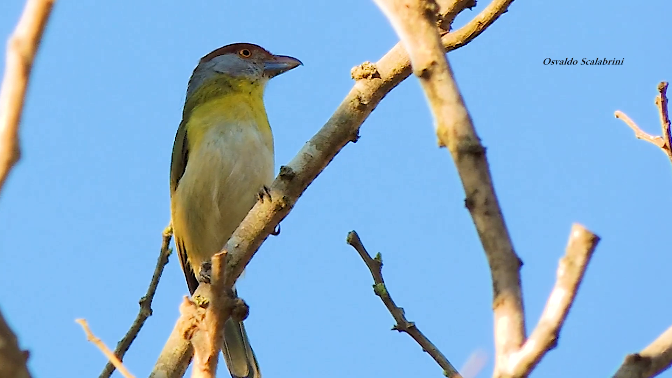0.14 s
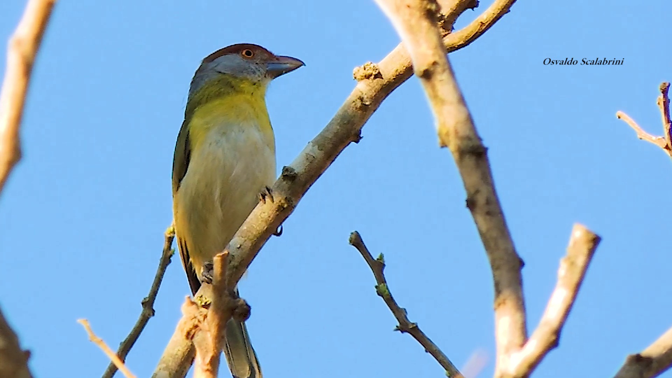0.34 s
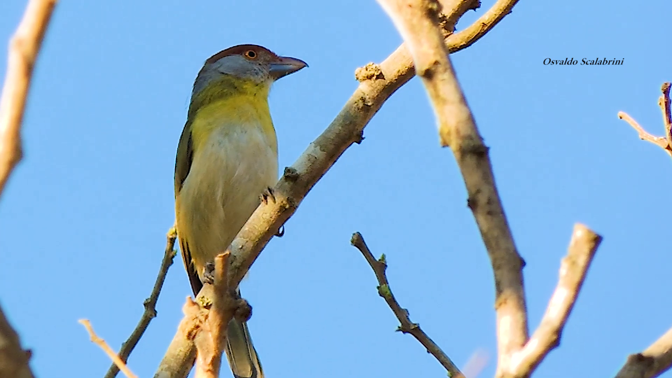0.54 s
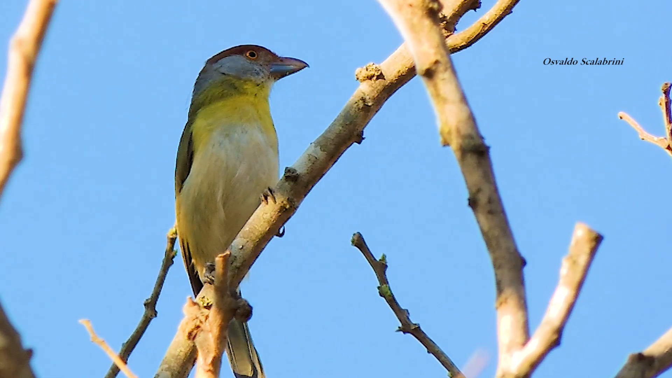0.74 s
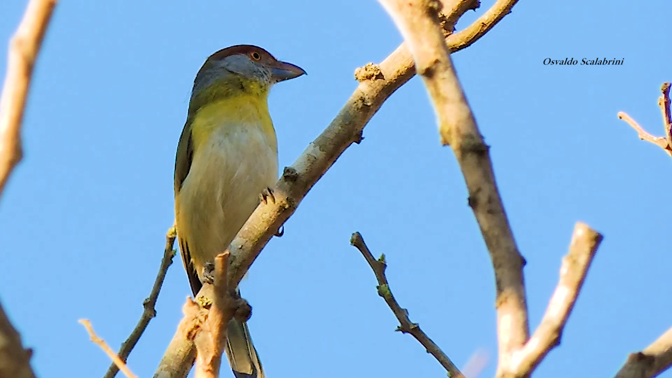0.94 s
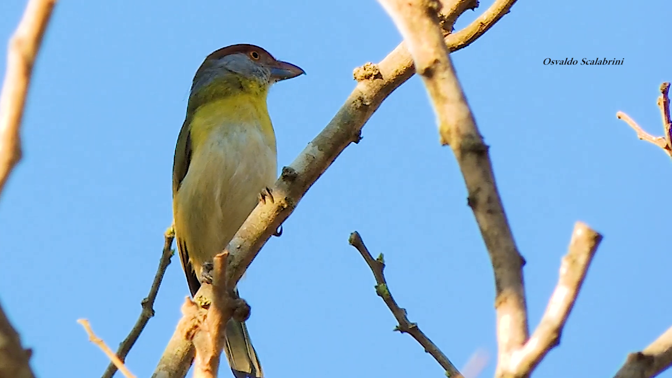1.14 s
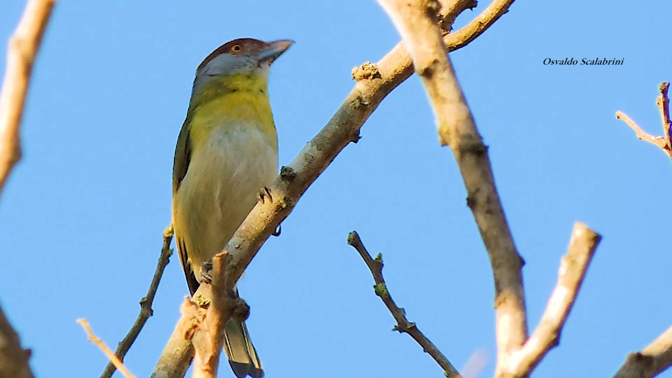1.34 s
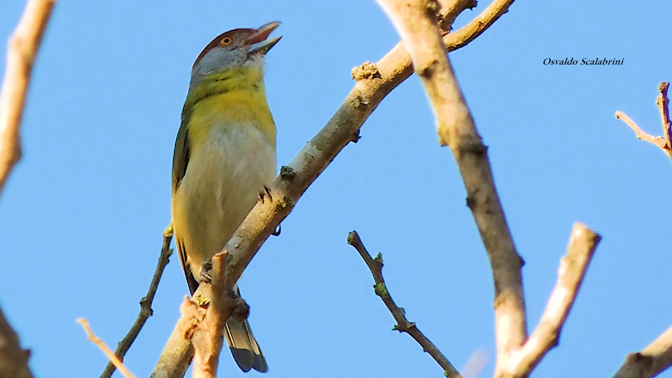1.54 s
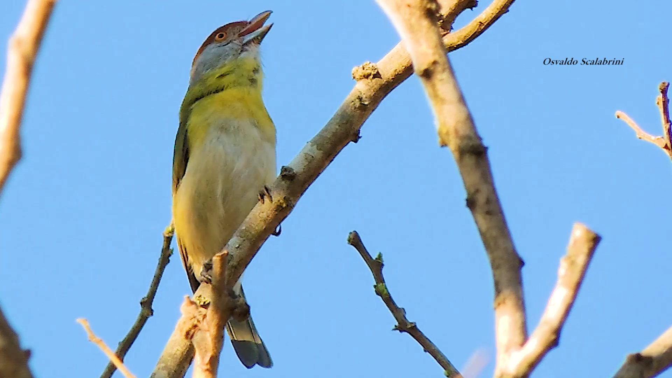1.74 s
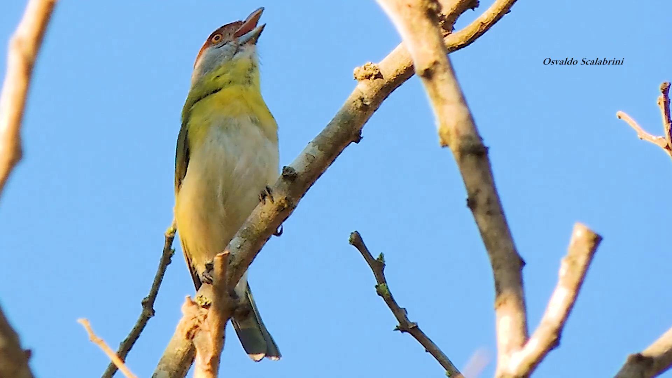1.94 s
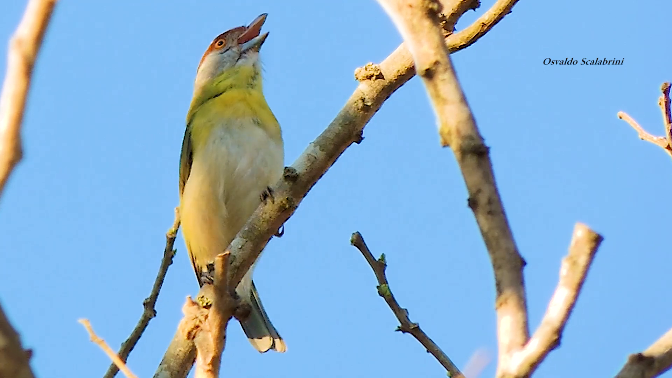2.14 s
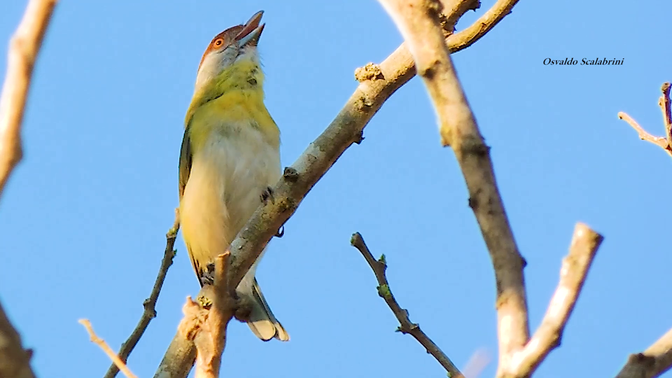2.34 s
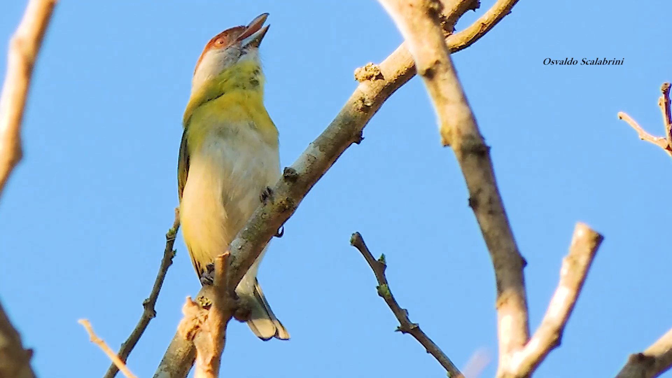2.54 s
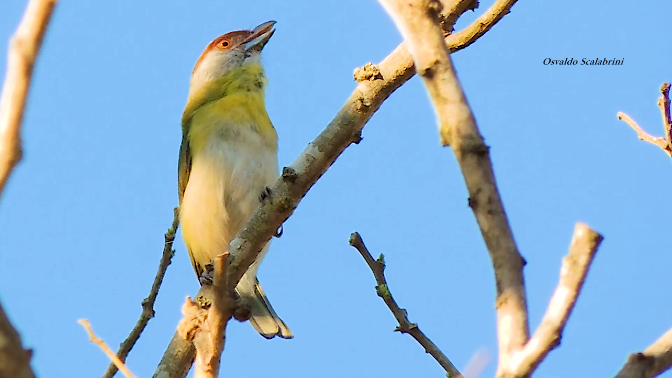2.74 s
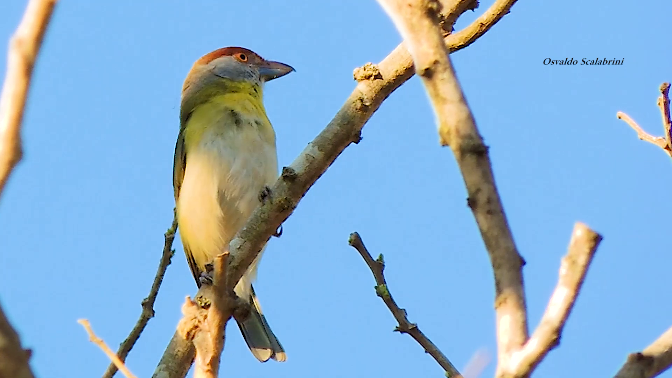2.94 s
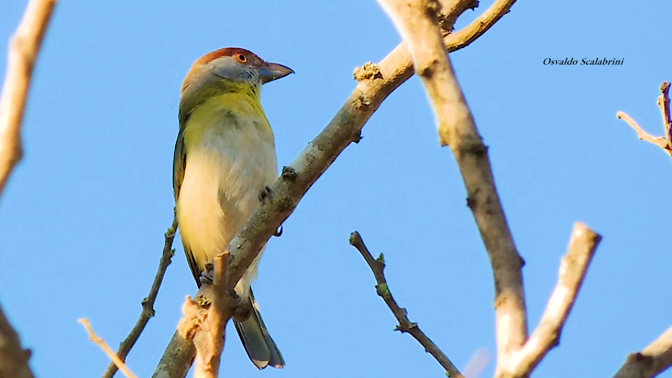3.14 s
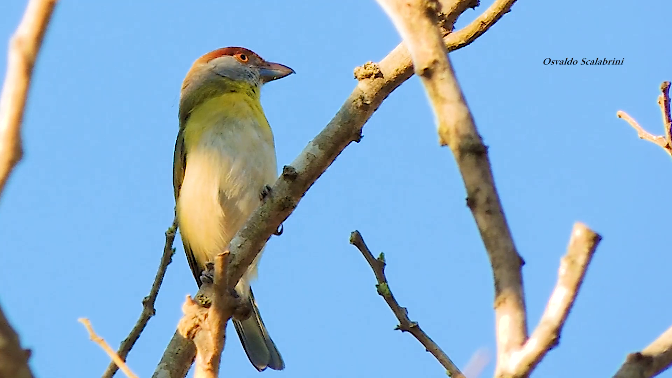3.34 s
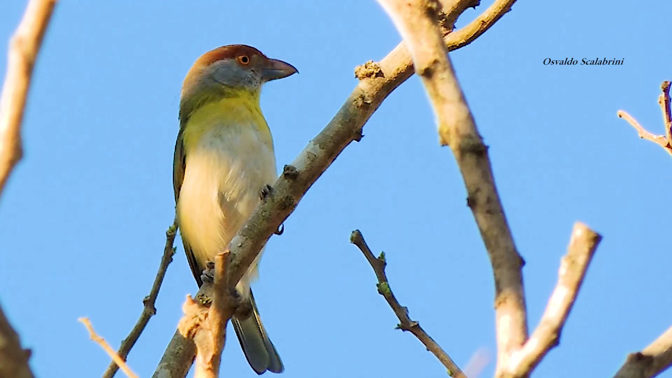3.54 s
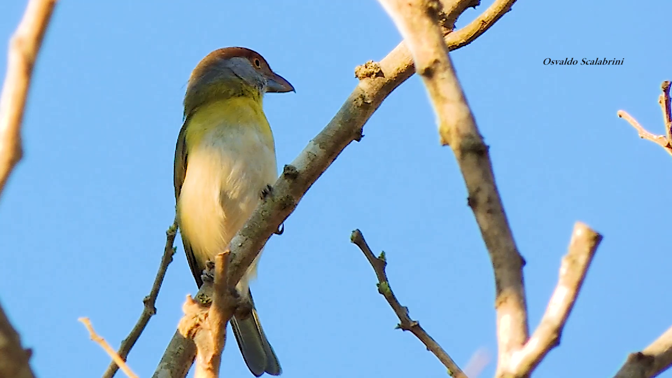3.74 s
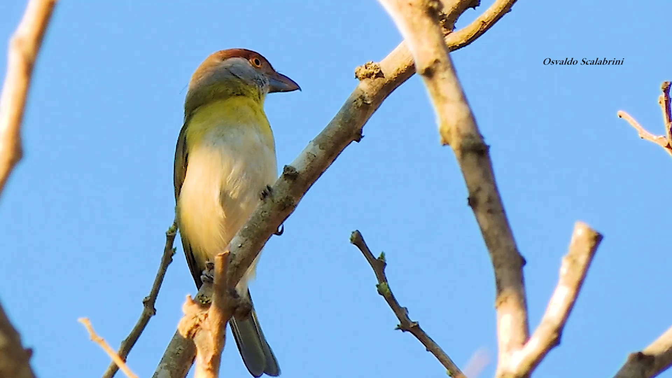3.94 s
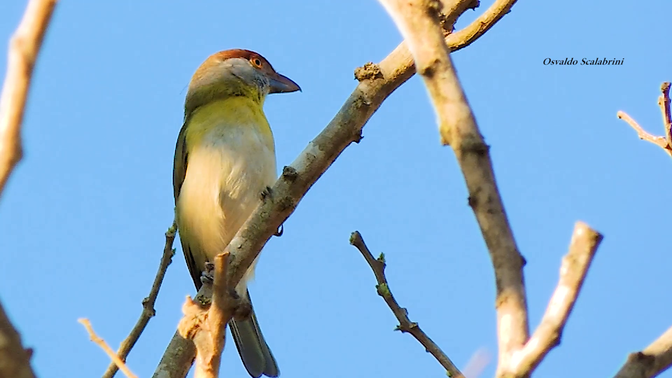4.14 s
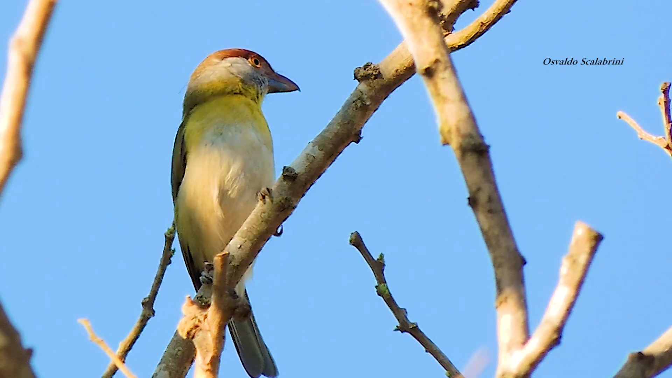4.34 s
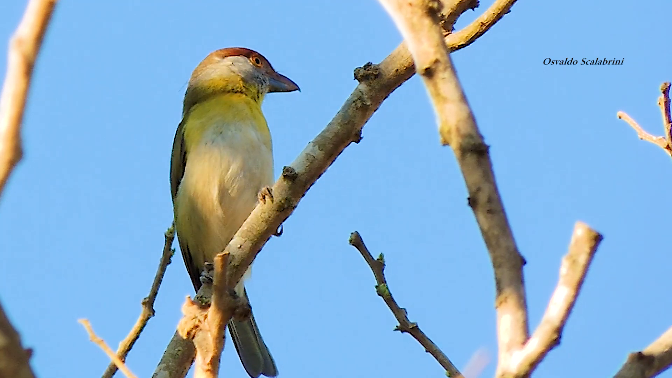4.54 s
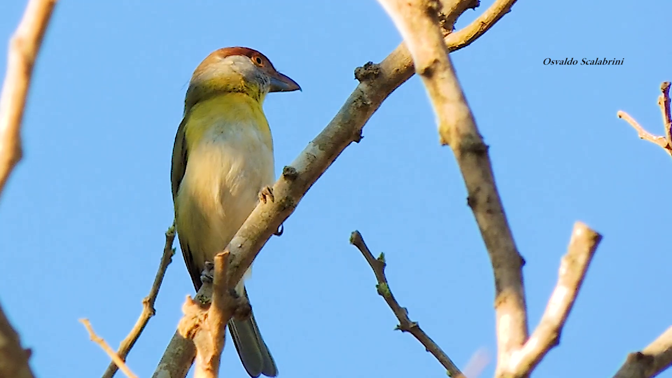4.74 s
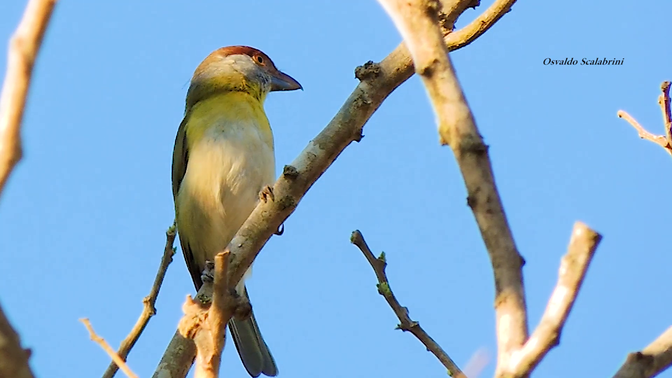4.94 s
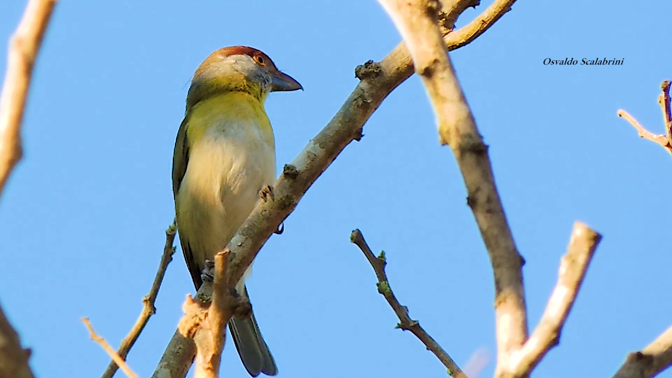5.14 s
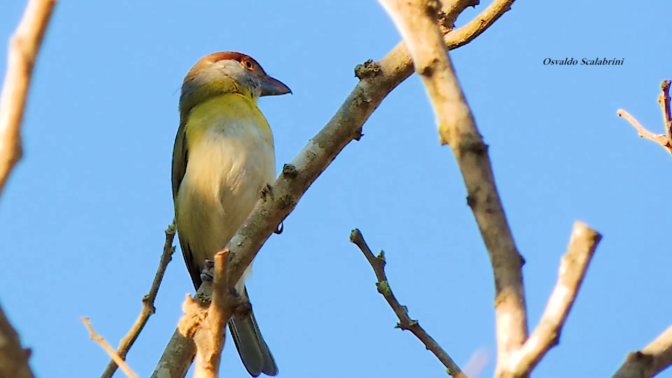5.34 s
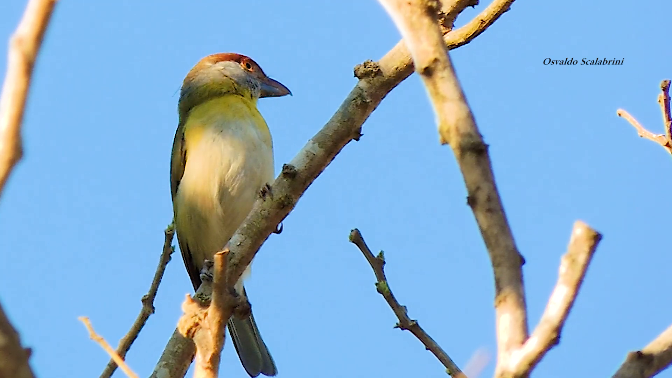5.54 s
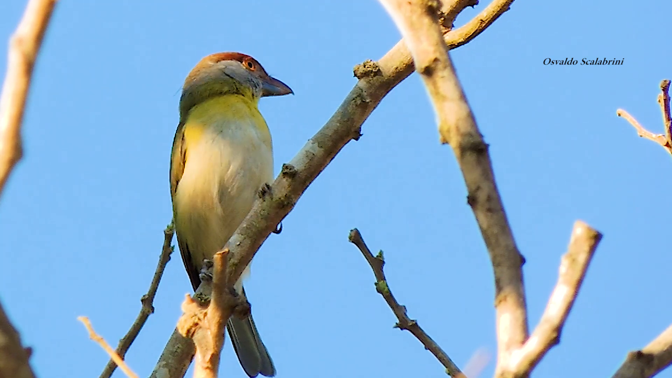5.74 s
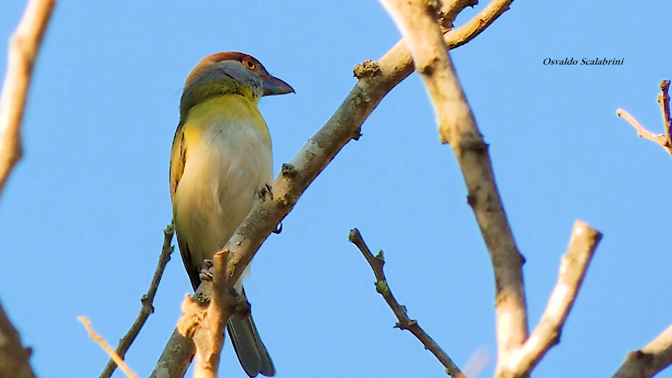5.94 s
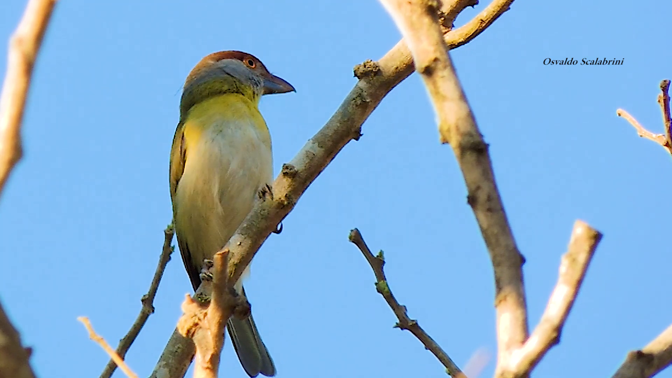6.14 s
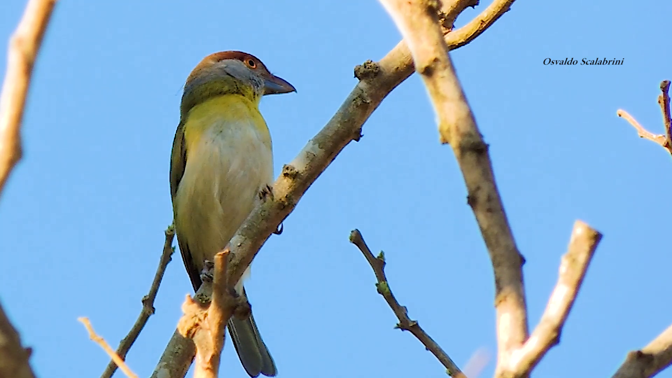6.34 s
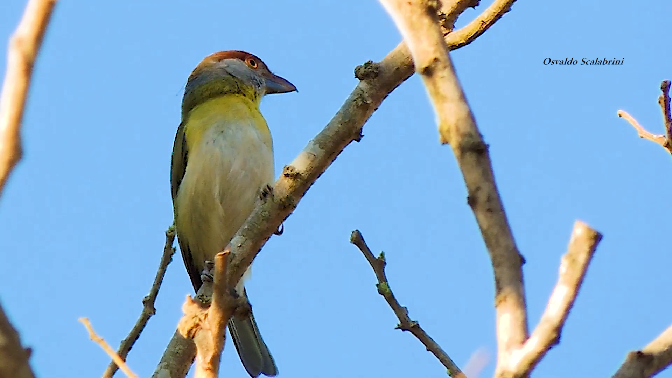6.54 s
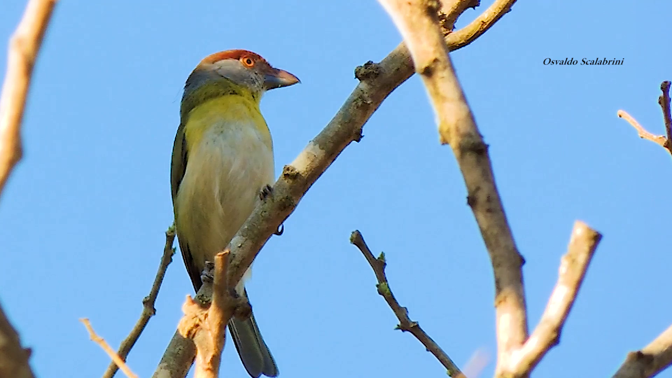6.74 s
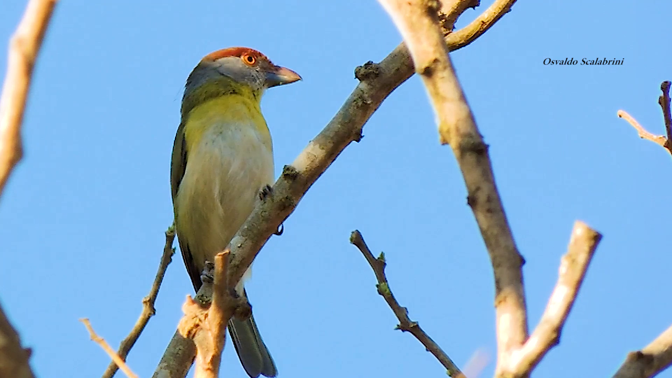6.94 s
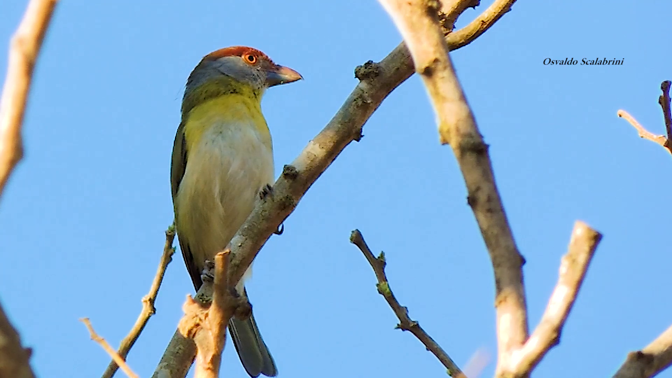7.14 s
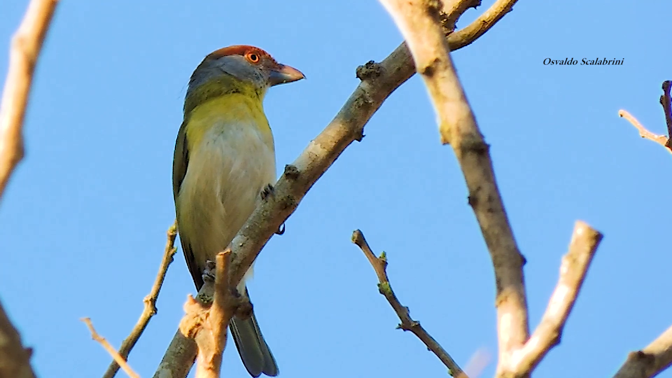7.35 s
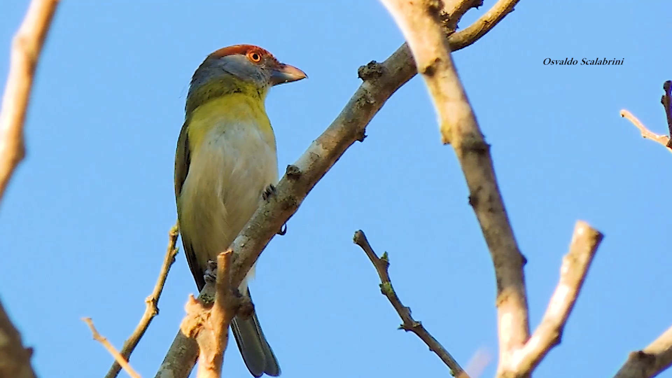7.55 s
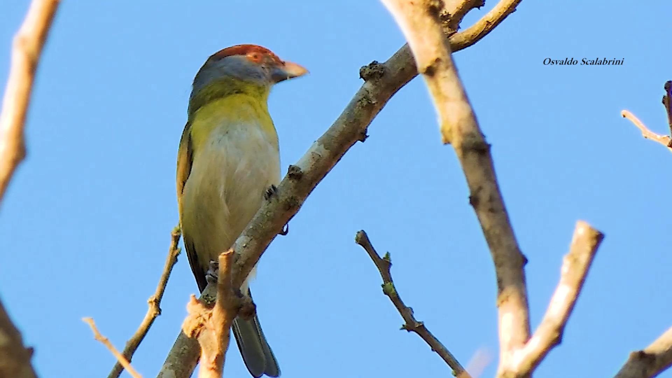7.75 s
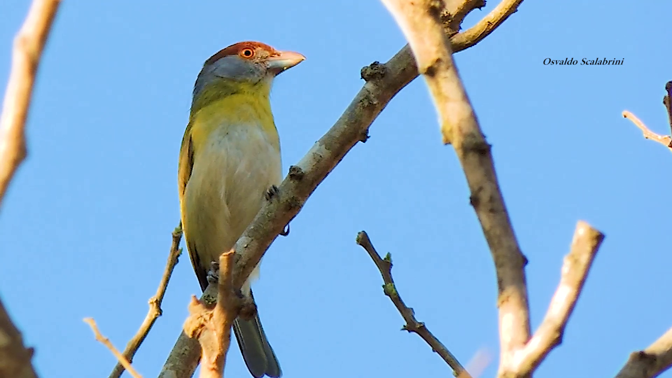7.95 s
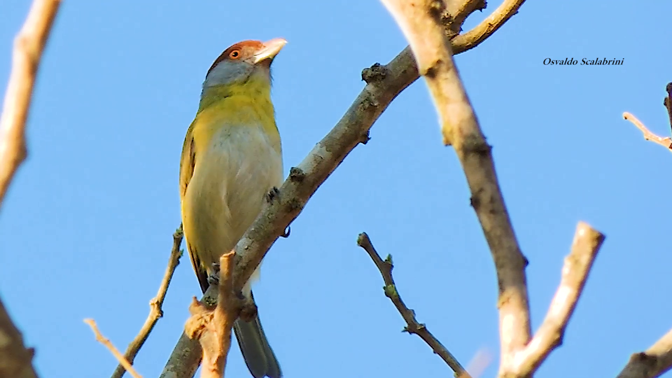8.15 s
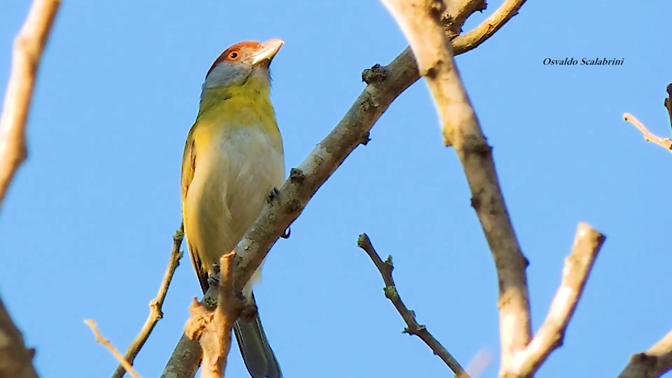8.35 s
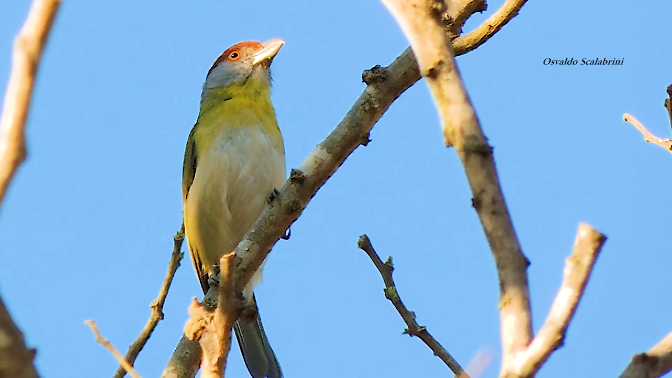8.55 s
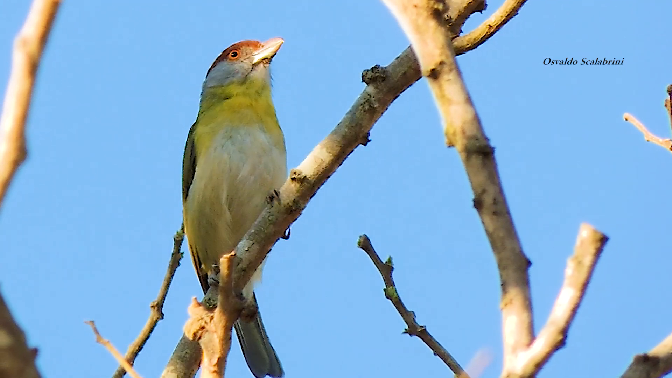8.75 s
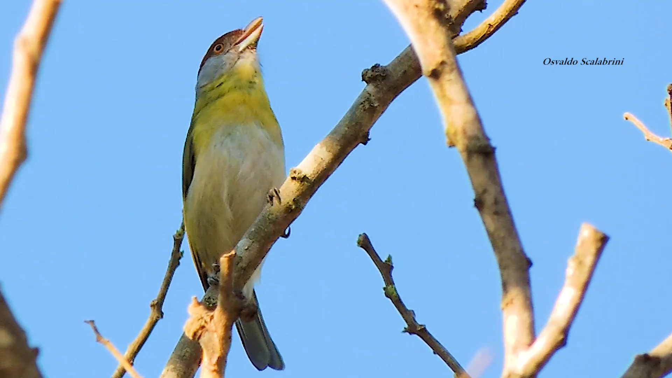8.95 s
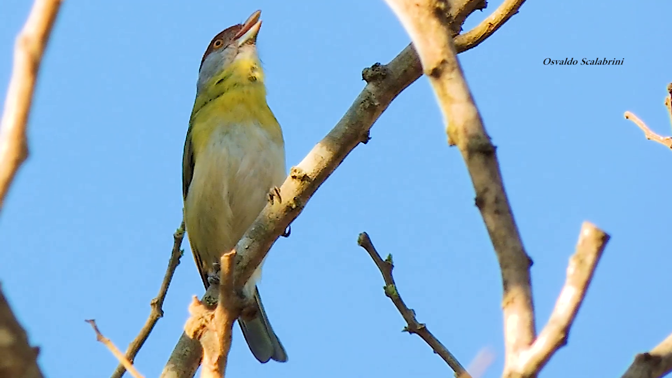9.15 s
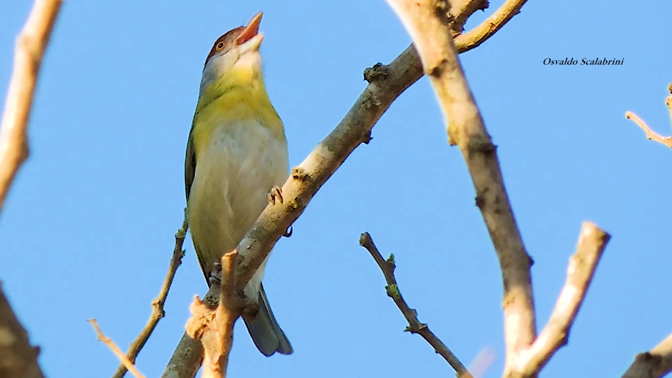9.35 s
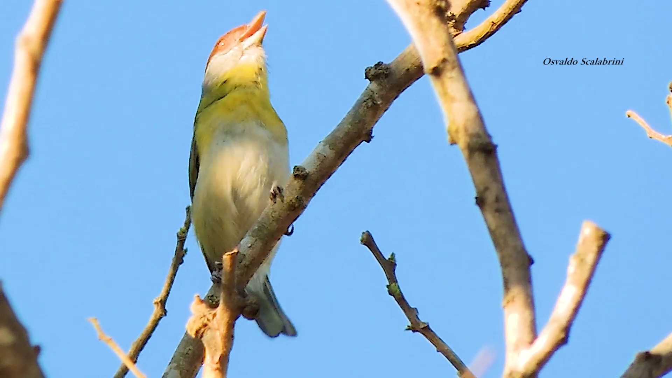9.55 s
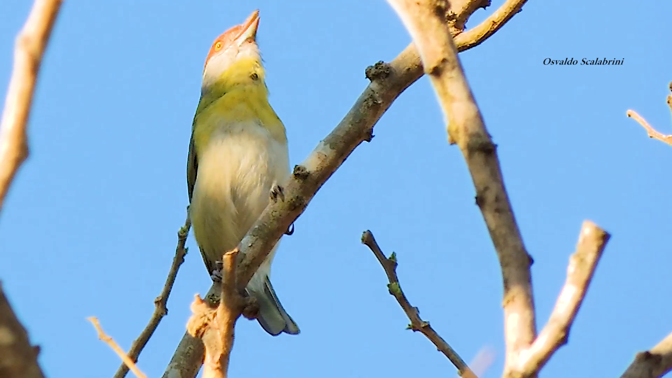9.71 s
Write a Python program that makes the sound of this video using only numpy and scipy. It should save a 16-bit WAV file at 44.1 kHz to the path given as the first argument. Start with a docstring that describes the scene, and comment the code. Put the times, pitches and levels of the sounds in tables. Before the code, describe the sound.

One small bird on a branch whistles loudly and close, its rapid up-and-down notes starting softly, growing stronger and leaving a short woodland echo. It rests for about six seconds, then repeats until the sound ends. Beneath it run a constant shrill cicada drone, a thin higher pulsing tone, regular cricket trills and faint distant chirps. Stereo outdoor microphone, bright hiss, no low rumble.

```python
"""A peppershrike whistles one quick warbled phrase and, after a long pause, starts it again: gliding sines
with overtones that grow with effort, scattered by branches and given a short tail by the wood.
Cicadas drone as pulsed, resonant noise and a thin pulsing tone; a cricket trills at intervals in toothed bursts.
Small birds call far off in short glides, and the open air hisses as filtered noise. The microphone takes no bass."""
import sys
import numpy as np
from scipy import signal
from scipy.fft import rfft, irfft
from scipy.io import wavfile
from scipy.ndimage import uniform_filter1d

SR = 44100
rng = np.random.default_rng(int(sys.argv[2]) if len(sys.argv) > 2 else 0)


def unload_audio(sound):
    """Save the sound as a 16-bit wav file, at the path given as the first command line argument."""
    columns = np.transpose(np.atleast_2d(sound))
    # keep every value between -1 and 1, then stretch to whole-number steps
    steps = np.round(np.clip(columns, -1, 1) * 32767)
    wavfile.write(sys.argv[1], SR, steps.astype(np.int16))


N = 435708
T = np.arange(N) / SR


def undb(db):
    """Decibels to gain."""
    return 10 ** (np.asarray(db) / 20)


def level(x, db):
    """Scale to an rms level in dB."""
    return x * undb(db) / np.sqrt(np.mean(x ** 2))


def at_pitch(table, hz):
    """Read a (frequency [Hz], value) table on a log-frequency axis."""
    table_hz, value = np.transpose(table)
    return np.interp(np.log(np.maximum(hz, 1)), np.log(table_hz), value)


def colour(x, table):
    """Filter by a (frequency [Hz], gain [dB]) table."""
    gain = undb(at_pitch(table, np.fft.rfftfreq(N, 1 / SR)))
    return irfft(rfft(x) * gain, N)


def walk(rate):
    """Smooth random wander of spread 1 that changes about rate times a second."""
    hold = max(int(SR / rate), 2)  # samples
    steps = np.repeat(rng.standard_normal(N // hold + 1), hold)
    wander = uniform_filter1d(steps, hold)[:N]
    return wander / wander.std()


def turn(hz):
    """Running phase of a frequency curve, in radians."""
    return 2 * np.pi * np.cumsum(hz) / SR


def throb(rate_hz, sharp, unsteady):
    """A nearly regular train of smooth pulses, narrower as sharp grows."""
    phase = turn(rate_hz * (1 + unsteady * walk(12)))
    return np.exp(sharp * (np.cos(phase) - 1))


def scatter(x, t60, db, delay=0.003, uneven=1):
    """Fading echoes, different at each microphone: many weak ones from leaves, a few strong ones from trunks."""
    t = T[:SR]
    # a higher uneven lets fewer, stronger echoes stand out
    spread = np.exp(uneven * np.clip(rng.standard_normal((2, SR)), -4, 4))
    sizes = rng.standard_normal((2, SR)) * spread
    fade = np.exp(-np.log(1000) * t / t60)  # 60 dB down after t60 seconds
    echoes = sizes * fade * (t > delay)
    echoes /= np.sqrt(np.sum(echoes ** 2, axis=1, keepdims=True))
    return undb(db) * signal.fftconvolve(x[None], echoes, axes=1)[:, :N]


def place(x, left_db):
    """Lean a sound left (positive) or right, left_db being the left-minus-right difference."""
    return x * undb(np.vstack([left_db, -left_db]) / 2)


# body resonance of the cicada chorus: (frequency [Hz], relative gain [dB])
CICADA_BODY = [(4900, -52.5), (5500, -8), (5850, -6.5), (6050, 0.5), (6190, -2), (6305, 4.5), (6450, 0.5),
               (6600, 3), (6880, -8), (7150, -18.5), (7400, -40)]


def cicada_chorus(near_db=-3, blur=1):
    """Rapid bursts of tymbal clicks ring the body; those from all around blur into a drone."""
    bursts = throb(rate_hz=56.4, sharp=.45, unsteady=.016)
    near = level(colour(rng.standard_normal(N) * bursts, CICADA_BODY), near_db)
    around = level(colour(rng.standard_normal((2, N)) * (blur + bursts), CICADA_BODY), 0)
    # the nearest one reaches the left microphone six samples early
    ports = np.array([np.roll(near, -6), near])
    drift = undb(0.12 * walk(3.4))
    return place(level(ports + around, -45.5) * drift, left_db=2.0)


# moments when the higher cicada slackens: (time [s])
SAG_TIMES = [.19, 1.742, 3.58, 4.58, 5.47, 6.401, 7.26, 8.888, 9.66]


def high_cicada(pitch_hz=7040, sag_hz=249, sag_s=0.12, rough=0.013):
    """A thinner pulsing tone just above the chorus, sagging in pitch now and then."""
    sag = sag_hz * sum(np.exp(-((T - time) / sag_s) ** 2) for time in SAG_TIMES)
    pitch = (pitch_hz - sag) * (1 + rough * walk(400))
    tone = throb(rate_hz=61.2, sharp=0.78, unsteady=0.02) * np.sin(turn(pitch))
    heard = place(tone + scatter(tone, t60=.3, db=-4), left_db=4)
    return level(heard, -55.0)


# cricket trills, about every 1.3 s, the first already under way: (start [s], relative level [dB])
CRICKET_TRILLS = [(-.25, -56.5), (1.00, -55.5), (2.28, -55), (3.48, -54), (4.78, -55), (6.02, -55.5),
                  (7.341, -54), (8.67, -54)]


def cricket(pitch_hz=4830, droop_hz=110, length_s=.64, rough=.006):
    """Trills of wing strokes that swell quickly, then fade and droop in pitch."""
    loud, droop = np.zeros(N), np.zeros(N)
    for start, db in CRICKET_TRILLS:
        span = (T > start) & (T < start + length_s)
        u = (T[span] - start) / length_s  # share of the trill gone by
        loud[span] = undb(db) * np.abs(np.sin(np.pi * u ** 0.67)) ** 0.58
        droop[span] = droop_hz * u ** 3
    strokes = throb(rate_hz=47.5, sharp=1.9, unsteady=.008)
    pitch = (pitch_hz - droop) * (1 + rough * walk(300))
    trill = loud * level(strokes * np.sin(turn(pitch)), 0)
    return place(undb(-4.5) * trill + scatter(trill, t60=0.26, db=-4.5), left_db=6.0)


# spectrum of the open air: (frequency [Hz], relative gain [dB])
AIR_SPECTRUM = [(200, -55), (310, -42.5), (500, -23.5), (750, -13), (1100, -2.5), (1800, 3), (3200, 1),
                (5200, 0), (7700, -3), (10000, -5.5), (14000, -6)]
# likeness of the air's noise left and right: (frequency [Hz], correlation [-1 to 1])
AIR_LIKENESS = [(100, 0.83), (280, 0.1), (610, 1), (1330, 0.26), (2900, -0.27), (8000, -0.022)]


def air():
    """A soft hiss of distant foliage: filtered noise, shared between the sides by frequency."""
    likeness = np.clip(at_pitch(AIR_LIKENESS, np.fft.rfftfreq(N, 1 / SR)), -1, 1)
    # the mid is common to both sides, the side is opposed
    shares = np.sqrt([1 + likeness, 1 - likeness])
    mid, side = irfft(rfft(rng.standard_normal((2, N))) * shares, N)
    hiss = level(colour(np.array([mid + side, mid - side]), AIR_SPECTRUM), -48.0)
    return place(hiss * undb(0.1 * walk(3.3)), left_db=0.45)


def chirp(start, length, from_hz, to_hz, db, rasp):
    """One straight glide that swells and fades; rasp shakes its pitch."""
    call = np.zeros(N)
    span = (T > start) & (T < start + length)
    u = (T[span] - start) / length
    pitch = (from_hz + (to_hz - from_hz) * u) * (1 + rasp * walk(900)[span])
    swell = np.sqrt(2 * np.abs(np.sin(np.pi * u)))
    call[span] = undb(db) * swell * np.sin(turn(pitch))
    return call


def twitter(start, length, db, count=6, leap=.13, jump=.04):
    """Falling chirps in quick succession that leap up and down while they sink in pitch."""
    trend = np.linspace(5000, 3404, count)  # Hz, before the leaps
    leaps = 1 - leap * (-1) ** np.arange(count) + jump * rng.standard_normal(count)
    chirp_s, fall = .015, .8  # fall: last pitch over first
    return sum(chirp(start + length * k / count, chirp_s, hz, fall * hz, db, rasp=0.013)
               for k, hz in enumerate(trend * leaps))


# clear chirps of distant birds: (start [s], length [s], first pitch [Hz], last pitch [Hz], relative level [dB])
FAR_CHIRPS = [(0.504, 0.03, 4040, 4230, -51.5), (0.544, .02, 5540, 5430, -44.5),
              (3.475, .028, 4080, 3960, -55), (3.638, .025, 6200, 5200, -46.5),
              (5.335, 0.046, 8450, 8700, -51.5), (7.476, 0.096, 8030, 8470, -47),
              (7.478, .032, 4950, 5130, -58)]
# twitters, runs of quick falling chirps: (start [s], length [s], relative level [dB])
TWITTERS = [(0.544, .06, -54.5), (3.618, .075, -52)]
# faint rasping calls, all near one pitch: (start [s], length [s], relative level [dB])
RASPS = [(1.945, 0.24, -57), (4.65, 0.23, -59.5), (5.107, 0.046, -51.5), (5.615, .04, -59),
         (7.79, .092, -59), (7.966, 0.14, -58.5), (8.63, 0.046, -54.5)]


def far_birds(rasp_hz=3935):
    """Short gliding chirps, twitters and rasps, heard mostly through their echoes."""
    chirps = sum(chirp(*row, rasp=0.009) for row in FAR_CHIRPS)
    twitters = sum(twitter(*row) for row in TWITTERS)
    rasps = sum(chirp(start, length, rasp_hz, rasp_hz, db, rasp=0.067) for start, length, db in RASPS)
    calls = chirps + twitters + rasps
    return place(undb(-2.5) * calls + scatter(calls, t60=0.38, db=4.0), left_db=2.5)


# The phrase is five pairs, a quick lead-in and a held whistle; the lead-in is a flick twice, then a zigzag three times.
# flicks, a short arch that falls away: (start [s], length [s], relative level [dB], rise [s], top [Hz])
FLICKS = [(1.729, 0.043, -40, .016, 2710), (1.923, .037, -31.5, .006, 3170)]
# zigzags, two falls with a hump between:
# (start [s], length [s], relative level [dB], top [Hz], dip [Hz], hump [Hz])
ZIGZAGS = [(2.157, .084, -22.5, 3620, 2490, 2730), (2.440, 0.1, -22.5, 3570, 2040, 2553),
           (2.738, .120, -21, 3274, 2090, 2500)]
# whistles scoop up to a crest, sink to a trough and lift a little: (start [s], length [s], relative level [dB],
# attack [s], fade [dB], scoop [s], first pitch [Hz], crest [Hz], trough [Hz])
WHISTLES = [(1.778, 0.08, -25, 0.028, 7, .016, 2600, 3130, 2814),
            (1.987, 0.11, -23.5, .016, 0.5, .033, 2100, 2555, 2255),
            (2.243, .139, -21.5, .016, 0.5, .021, 1900, 3114, 2562),
            (2.569, 0.12, -22, 0.013, 0, 0.031, 2004, 2547, 2298),
            (2.863, .180, -22, 0.013, 5, .048, 1752, 2565, 2075)]


def phrase():
    """Notes as (start [s], length [s], level [dB], attack [s], fade [dB], turns [share of length], pitches [Hz])."""
    attack_s = .011  # of the lead-ins
    notes = []
    for start, length, db, rise, top in FLICKS:
        turns = [0, rise / length, 1]
        notes.append((start, length, db, attack_s, 0, turns, [0.9 * top, top, 2066]))
    for start, length, db, top, dip, hump in ZIGZAGS:
        turns = [0, .09, .46, .645, 1]
        notes.append((start, length, db, attack_s, 0, turns, [.85 * top, top, dip, hump, .69 * hump]))
    for start, length, db, attack, fade, scoop, first, crest, trough in WHISTLES:
        turns = [0, scoop / length, .76, 1]
        notes.append((start, length, db, attack, fade, turns, [first, crest, trough, 1.04 * trough]))
    return notes


def glide(u, turns, pitches, settle=1.35, last_bend=1.4):
    """Pitch through a note: a fast start slowing into the top, slurs that settle, a last one cut off in motion."""
    leg = np.interp(u, turns, np.arange(len(turns)))  # whole part: which leg; fraction: how far along it
    rise = np.sin(leg * np.pi / 2)
    slur = 1 - np.abs(np.cos(leg % 1 * np.pi / 2)) ** (2 * settle)
    last = (leg % 1) ** last_bend
    later = np.floor(leg) + np.where(u > turns[-2], last, slur)
    eased = np.where(leg < 1, rise, later)
    return np.interp(eased, np.arange(len(turns)), pitches)


# how throat and open beak pass the overtones: (frequency [Hz], relative gain [dB])
BEAK = [(3500, -30), (5000, -37), (7500, -54), (8700, -32.5), (9700, -24), (10800, -35.5), (12000, -36),
        (13200, -23.5), (15000, -33)]
# how well the whistle carries at each pitch: (pitch [Hz], gain [dB])
CARRY = [(1750, -14.5), (2050, -12), (2140, -4.5), (2250, -5.5), (2360, 1), (2470, -7.5), (2560, -1),
         (2660, -1), (2800, -0.5), (3080, -0.5), (3300, -6), (3650, -3)]
# lean between the microphones with pitch: (pitch [Hz], left minus right [dB])
PITCH_LEAN = [(2120, 0), (2420, 1), (2530, -3), (2650, -5), (2850, -1), (3500, -3.5)]


def peppershrike(waver=0.0043, flutter_db=1.0, overtone_db=1, full_db=-23, brighten=0.18):
    """A nearly pure gliding whistle whose overtones grow with effort and on fast glides."""
    repeat_s, release_s = 7.436, 0.0045  # phrase start to phrase start; release of every note
    harsh_db, fast_hz_per_s = 4.5, 60000  # overtones gain this much on glides this fast
    whistle, sheen, lean = np.zeros((3, N))
    quiver, flutter = 1 + waver * walk(400), flutter_db * walk(70)
    for delay in (0, repeat_s):
        for start, length, db, attack, fade_db, turns, pitches in phrase():
            span = (T > start + delay) & (T < start + delay + length)
            t = T[span] - start - delay
            aim = glide(t / length, turns, pitches)
            pitch = aim * quiver[span]
            phase = turn(pitch)

            gate = np.clip(np.minimum(t / attack, (length - t) / release_s), 0, 1)
            envelope = np.sin(gate * np.pi / 2) ** 2
            carry = uniform_filter1d(at_pitch(CARRY, pitch), size=100)
            loud = undb(db - fade_db * t / length + carry + flutter[span]) * envelope

            speed = np.abs(np.diff(aim, prepend=aim[:1])) * SR  # Hz per second
            harsh = undb(harsh_db * np.minimum(speed / fast_hz_per_s, 1))
            effort = (loud / undb(full_db)) ** brighten
            overtones = harsh * sum(undb(at_pitch(BEAK, k * pitch) + overtone_db) * np.sin(k * phase)
                                    for k in range(2, 6))

            whistle[span] += np.sqrt(2) * loud * np.sin(phase)
            sheen[span] += np.sqrt(2) * loud * overtones * effort
            lean[span] = at_pitch(PITCH_LEAN, pitch)
    voice = whistle + sheen
    # a few near branches answer strongly and beat against the glides; the wood behind rings on smoothly
    branches = scatter(voice, t60=.1, db=-8, delay=.003, uneven=2.4)
    wood = scatter(whistle, t60=0.78, db=-14.5, delay=.014, uneven=1.7)
    # twigs and leaves throw back the short waves of the overtones most
    twigs = scatter(sheen, t60=0.2, db=-4.5, delay=0.0085, uneven=1.1)
    return place(voice, lean) + branches + wood + twigs


def scene():
    """Insects, air and far birds behind the singer."""
    insects = cicada_chorus() + high_cicada() + cricket()
    return insects + air() + far_birds() + peppershrike()


def record(dry, low_cut_hz=250, top_hz=14100):
    """The recorder cuts the bass, and the top steeply."""
    thin = signal.sosfilt(signal.butter(4, low_cut_hz, "high", fs=SR, output="sos"), dry)
    return signal.sosfilt(signal.ellip(12, .1, 80, top_hz, fs=SR, output="sos"), thin)


dry = scene()
out = record(dry)
unload_audio(out)
```